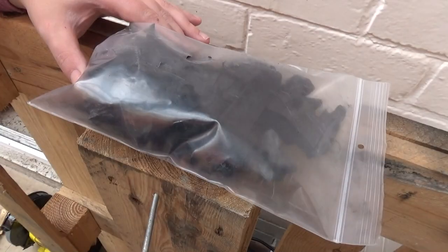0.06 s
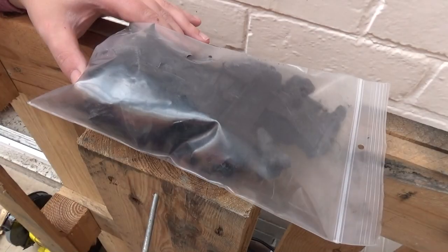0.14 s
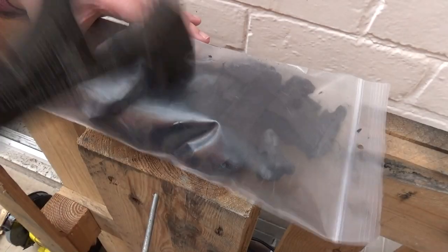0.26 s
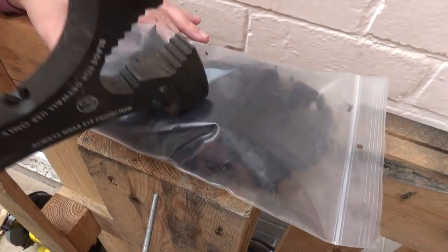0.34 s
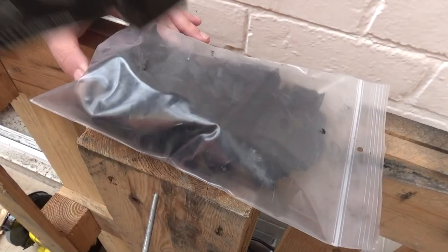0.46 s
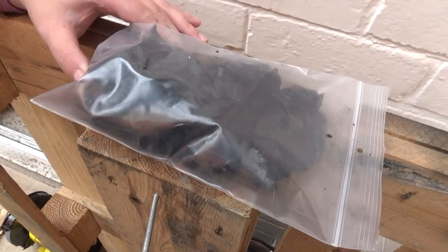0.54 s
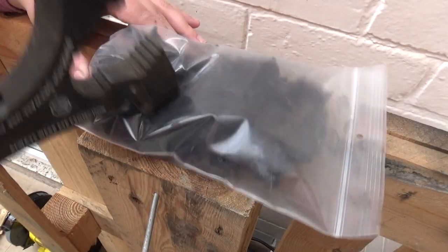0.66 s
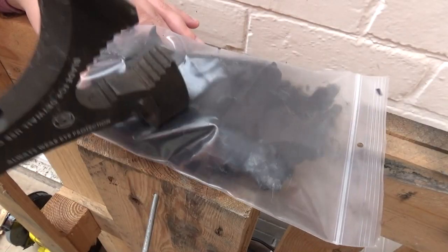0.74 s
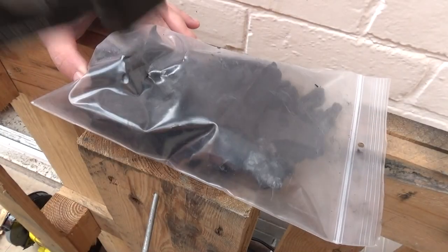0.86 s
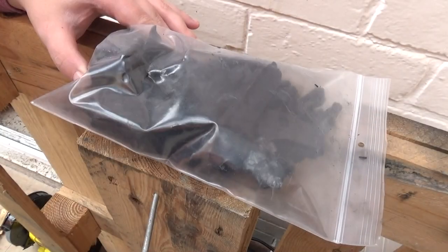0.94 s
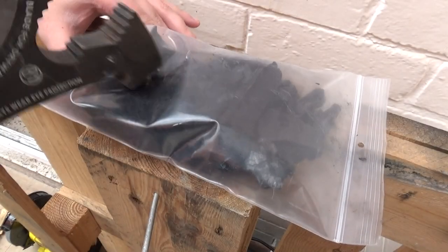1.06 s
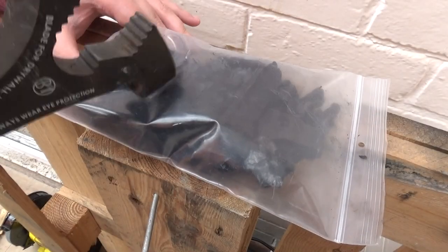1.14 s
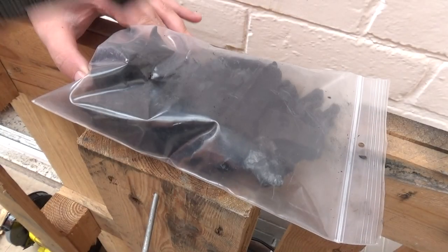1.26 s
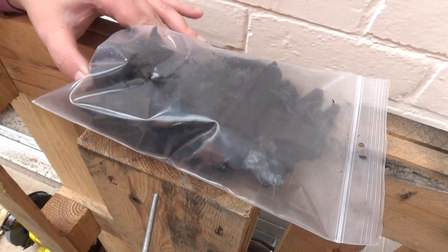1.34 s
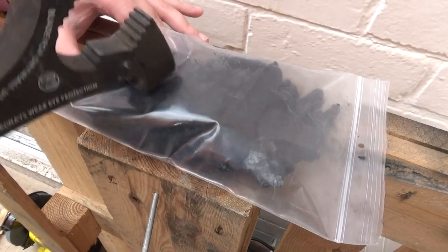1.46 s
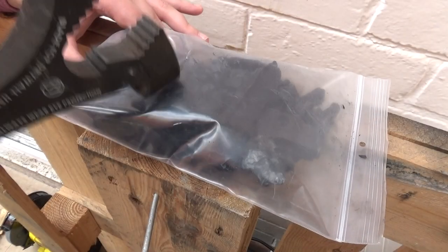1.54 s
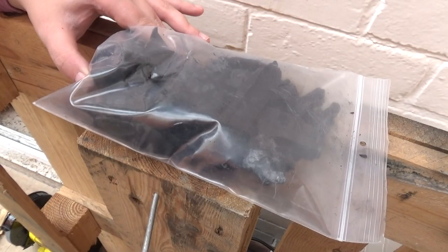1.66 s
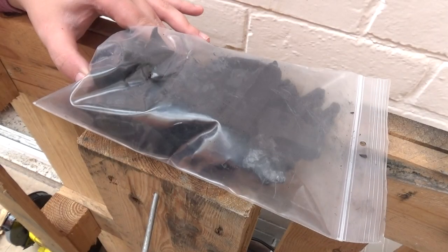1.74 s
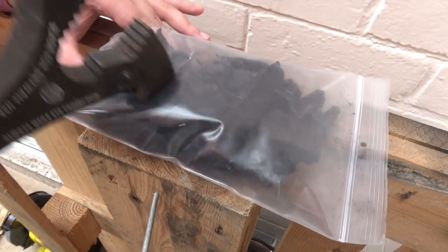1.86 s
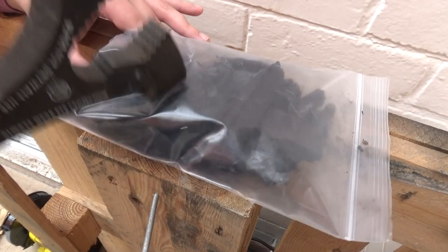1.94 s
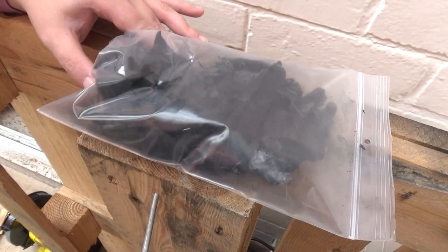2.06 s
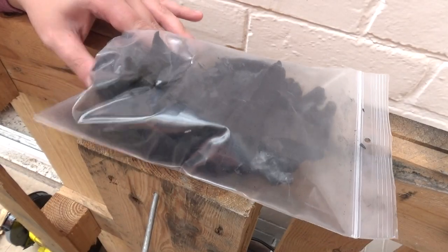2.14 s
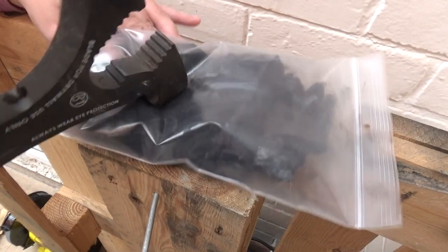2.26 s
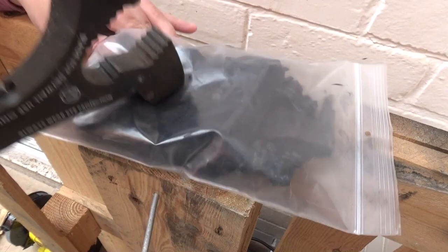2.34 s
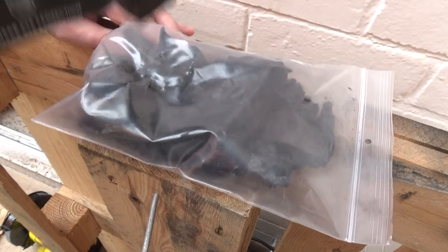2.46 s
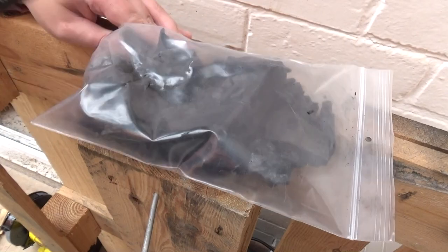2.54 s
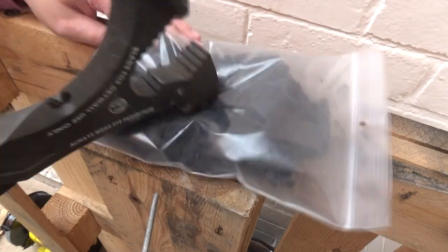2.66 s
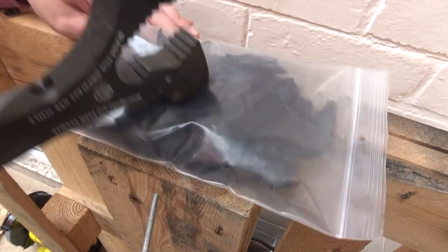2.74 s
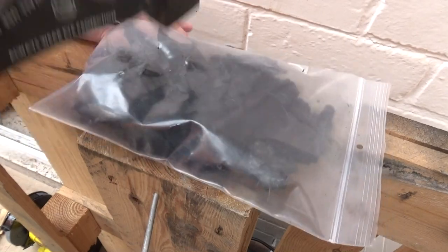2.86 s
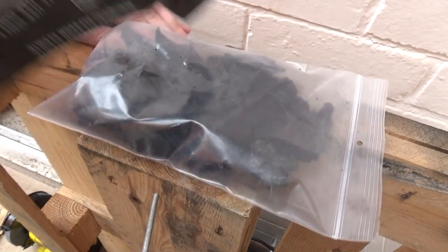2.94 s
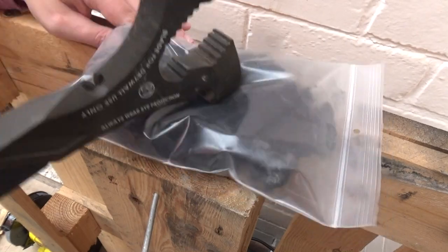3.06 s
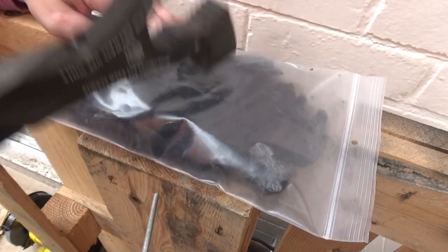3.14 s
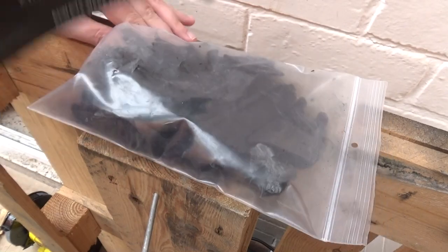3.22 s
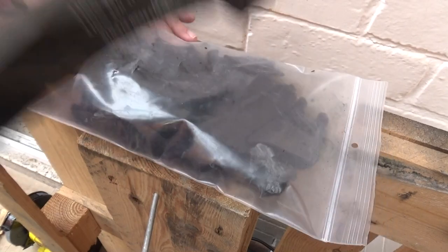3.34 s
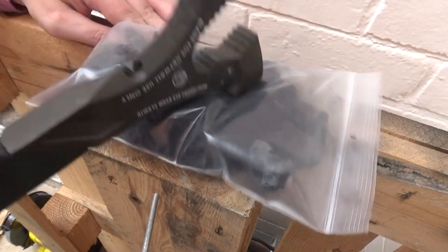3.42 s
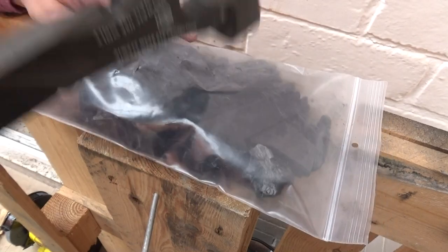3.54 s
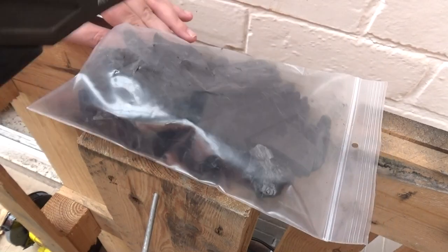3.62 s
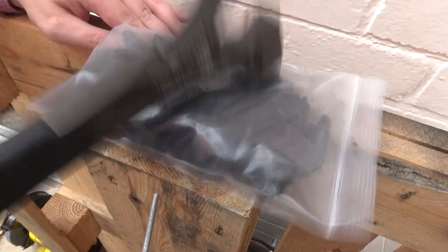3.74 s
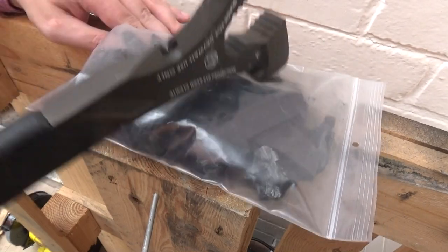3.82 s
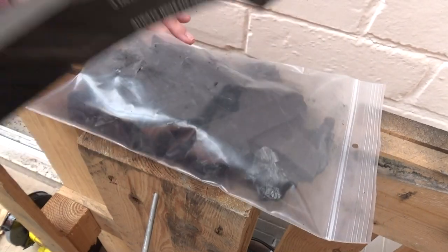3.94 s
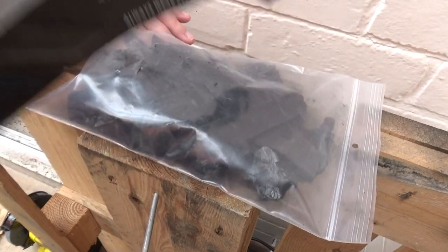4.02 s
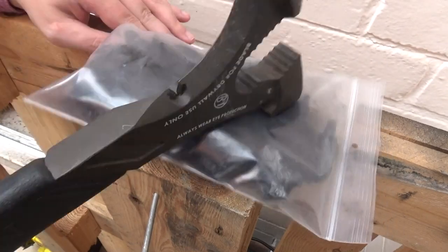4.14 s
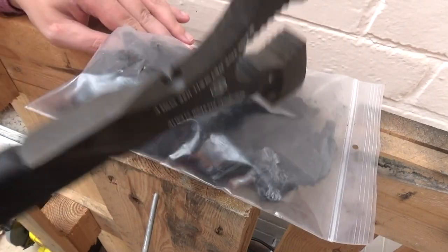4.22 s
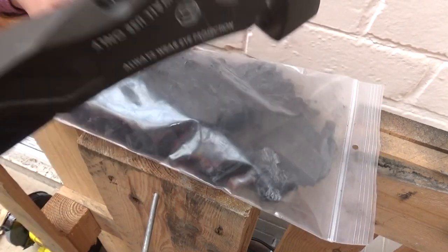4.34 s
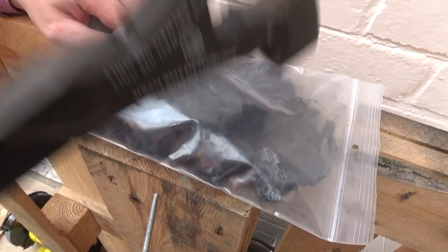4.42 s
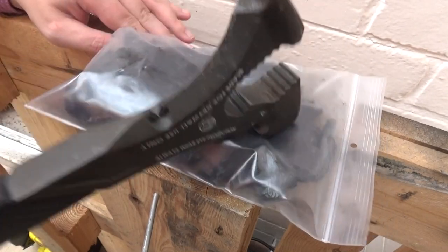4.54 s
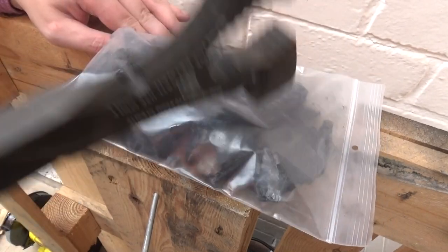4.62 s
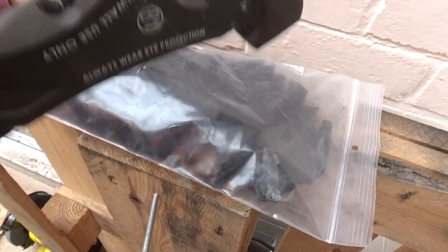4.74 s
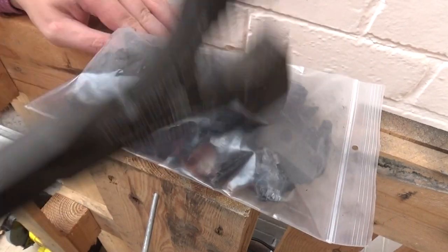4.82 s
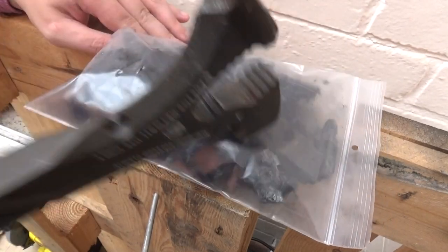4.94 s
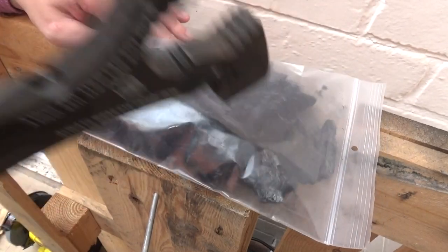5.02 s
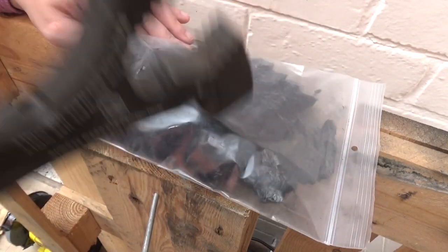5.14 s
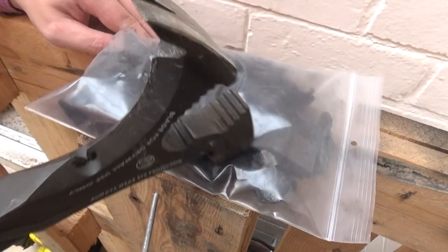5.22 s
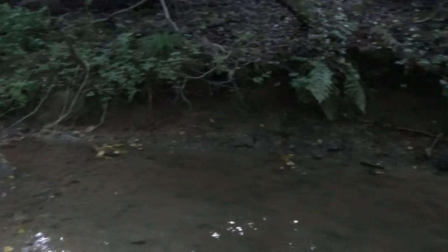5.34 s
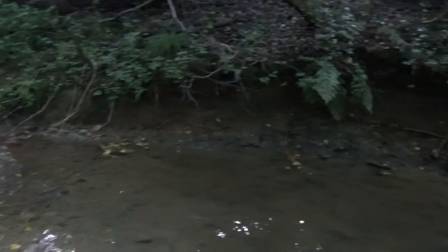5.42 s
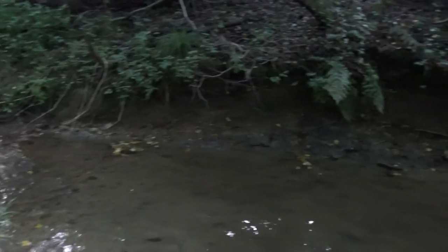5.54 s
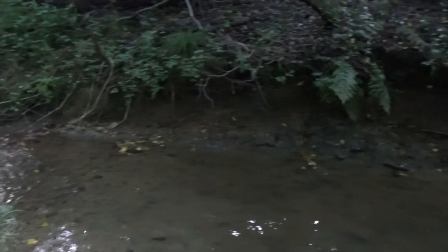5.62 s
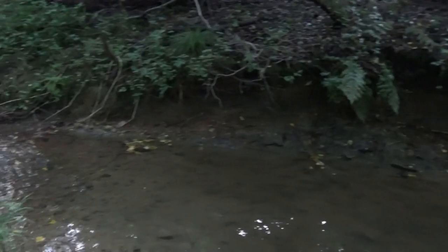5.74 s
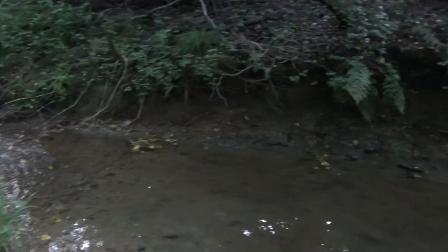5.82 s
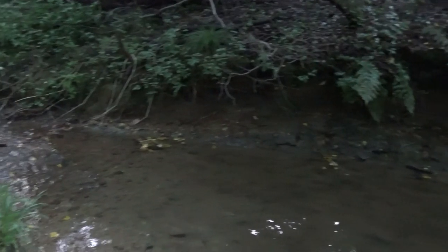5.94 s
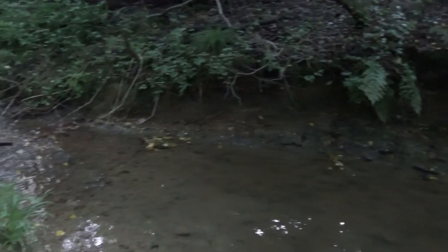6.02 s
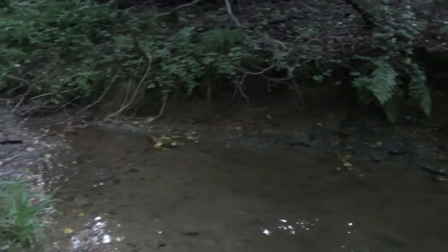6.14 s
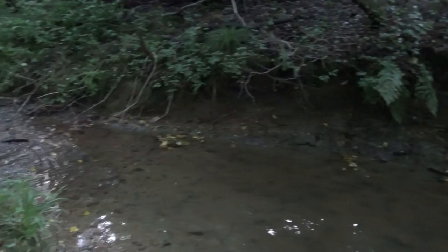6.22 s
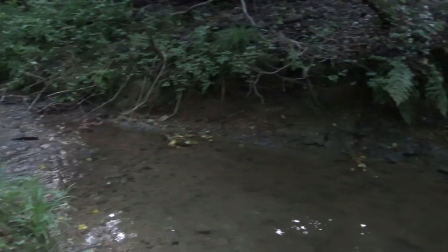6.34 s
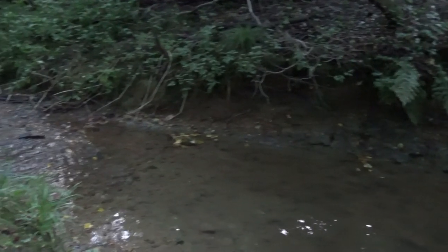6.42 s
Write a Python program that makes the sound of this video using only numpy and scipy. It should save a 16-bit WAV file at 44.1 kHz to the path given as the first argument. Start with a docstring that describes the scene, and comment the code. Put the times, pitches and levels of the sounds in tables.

```python
"""A hammer crushes charcoal in a plastic bag on a wooden bench, in a small brick workshop.
Each blow is a burst of fracture clicks, a knock and a ringing bench; a limiter ducks it,
so the room, an echo of banded noise, seems to swell behind it. Crumbs settle and the bag
crinkles between blows as resonated random clicks. Then the scene cuts to a woodland creek:
filtered noise as wash, narrow noise bands as gurgle and decaying ones as plopping drops."""
import sys
import numpy as np
from scipy import signal
from scipy.fft import rfft, irfft
from scipy.io import wavfile
from scipy.ndimage import uniform_filter1d

SR = 44100
rng = np.random.default_rng(int(sys.argv[2]) if len(sys.argv) > 2 else 0)


def unload_audio(sound):
    """Save the sound as a 16-bit wav file, at the path given as the first command line argument."""
    columns = np.transpose(np.atleast_2d(sound))
    # keep every value between -1 and 1, then stretch to whole-number steps
    steps = np.round(np.clip(columns, -1, 1) * 32767)
    wavfile.write(sys.argv[1], SR, steps.astype(np.int16))


N = 285765
# hammer blows: t/s, crush length/s, crush level/dB, knock level/dB, pitch factor, bench sway level/dB
HAMMER_BLOWS = [(-.016, .02, -0.5, -1.5, 1.17, -23.5), (0.38, 0.016, 4.5, 0, 1.25, -25),
                (0.759, 0.016, 0.5, -1, 1.05, -23.5), (1.161, 0.0065, 2.5, 3.5, 0.96, -19.5),
                (1.557, 0.008, -3.5, 3.5, 0.95, -18.5), (1.949, 0.0081, 0, 4, 1.14, -27),
                (2.35, .013, -4.5, -6, 1.82, -26.5), (2.757, .012, -6, -6.5, 1.02, -27),
                (3.119, 0.016, -7, -7.5, 0.92, -25), (3.501, 0.015, -5.5, -13, 0.68, -26.5),
                (3.859, 0.013, -7, -9.5, 1.63, -27), (4.224, 0.012, -7, -15, 1.35, -29),
                (4.586, 0.013, -8.5, -17, 1.35, -43), (4.954, 0.017, -10.5, -10.5, 1.34, -33),
                (5.298, 0.016, -12, -12, 0.66, -35)]
# fracturing charcoal, relative spectrum: f/Hz, density/(dB per Hz)
FRACTURE_SPECTRUM = [(30, -11), (80, -21.5), (200, -1), (450, -3.5), (900, 4), (1800, 1.5), (3000, -1),
                     (4800, -3), (6300, -6), (8000, -17), (11000, -19), (16000, -37)]
# knock of the bench top at pitch factor 1, relative spectrum: f/Hz, density/(dB per Hz)
KNOCK_SPECTRUM = [(40, -39.5), (120, -15.5), (200, -8), (450, 0.5), (750, -12.5), (1120, 6.5), (1650, -15),
                  (5000, -12), (16000, -76)]
# bench modes, before the spread from spot to spot: f/Hz, level/dB re knock, t60/s
BENCH_MODES = [(155.3, -20.5, 0.53), (181.9, -20, 0.38), (212.4, -30.5, 0.75), (246.3, -22.5, 0.49),
               (331.8, -11, 0.4), (436.7, -9.5, 0.21), (517.7, -8.5, 0.28), (564, -48, 0.94),
               (683, -10, 0.29), (755, -12, 0.31), (1010, -12.5, 0.19), (1156, -5, 0.11)]
# chips and creases of the bag, relative spectrum: f/Hz, density/(dB per Hz)
CRINKLE_SPECTRUM = [(60, -17), (300, 5), (900, 10.5), (2500, -3), (5700, 4.5), (8000, -15.5), (12000, -11),
                    (16000, -54)]
# handling of the bag, before RUSTLE_OFFSET_DB: t/s, level/dB
BAG_HANDLING = [(0.2, -43), (0.81, -41), (1.2, -44.5), (1.38, -55), (2.3, -41), (3.96, -54.5), (4.35, -76),
                (4.78, -55.5), (5.27, -60)]
# lumps shifting (low) and creases of the bag snapping (high): t/s, peak level/dB, centre f/Hz
SLIPS = [(0.131, -34, 1180), (.245, -17.5, 3500), (.316, -19, 1100), (0.458, -2, 2000), (0.554, -11, 1900),
         (0.565, -7.5, 1200), (0.604, -12.5, 1100), (.72, -23.5, 1343), (0.8045, -3, 4260),
         (.841, -2.5, 2280), (.952, -12, 1670), (.979, -11.5, 12000), (.997, -18, 1050),
         (1.12, -18.5, 1280), (1.753, -18.5, 1200), (2.133, -21, 1200), (2.26, -13.5, 2600),
         (2.262, -18, 450), (2.331, -16, 1500), (2.525, -16.5, 1310), (3.016, -24.5, 490),
         (3.233, -7, 2200), (3.795, -20, 1100), (4.35, -22, 4000), (4.456, -30, 3000), (4.484, -31, 800),
         (4.794, -20.5, 1900), (4.898, -28, 3500), (5.287, -21, 1100)]
# workshop echo: f/Hz, level/dB, t60/s
ROOM_ECHO = [(79.6, 0.5, 0.92), (198, -1.5, 0.5), (450, -3, 0.52), (694, 1, 0.26), (1100, -8, 0.34),
             (2000, -7.5, 0.34), (4630, -8, 0.32), (8000, -6.5, 0.26), (16000, -9, 0.26)]
# quiet air of the workshop, relative spectrum: f/Hz, density/(dB per Hz)
QUIET_SPECTRUM = [(20, -33), (45, -31), (70, -17), (200, -1.5), (500, -17), (2000, -10.5), (6000, -21),
                  (16000, -30)]
# steady wash of the creek, relative spectrum: f/Hz, density/(dB per Hz)
WASH_SPECTRUM = [(25, -5), (50, -2), (75, 7.5), (110, -2), (300, -2.5), (600, -6), (1000, -7.5),
                 (1500, -13), (2000, -16.5), (3500, -20.5), (5500, -20.5), (9000, -25), (16000, -26)]
# hollow gurgle, before the flow level: f/Hz, width/Hz, rms level/dB
GURGLE_BANDS = [(187.7, 23, -31), (257, 53, -28.5), (422, 25, -34), (473, 52, -32)]
# drops falling into the creek: t/s, level/dB, pitch factor
DROPS = [(5.411, -2, 1.41), (5.65, 0, 1), (6.0, -2, 1), (6.072, -6, 1.62)]
# ring of a drop at pitch factor 1: f/Hz, width/Hz, level/dB, decay time constant/s
DROP_BANDS = [(715, 140, -32, 0.088), (967, 85, -30, 0.12), (1370, 570, -36, 0.12),
              (2660, 400, -37.5, 0.035)]

GAP_START_S, GAP_END_S = 4.318, 4.343
CUT_S, CREEK_START_S = 5.36, 5.367
LEAD = 4410  # samples run before t = 0, trimmed at the end
EDGE_HZ = 15900
TIME_S = np.arange(-LEAD, N) / SR

# a soft knock means a cushion of crumbs, which the hammer touches before it bites
TOUCH_S, TOUCH_S_PER_DB, TOUCH_MAX_S = 0.002, -0.05, 0.0052
# the weaker the crush, the finer and brighter the pieces
TREBLE_DB, TREBLE_DB_PER_DB = -4, -0.5
# mode level and relative detuning change with the spot struck (standard deviations)
SPOT_SPREAD_DB, SPOT_DETUNE = 3.5, 0.0061
# long, hard crushes throw more crumbs; CRUMBS_DB holds for USUAL_CRUSH_S at 0 dB
CRUMBS_DB, USUAL_CRUSH_S, CRUMBS_DB_PER_S, CRUMBS_DB_PER_DB = -24, 0.011, 897, 1.13
# larger chips: mean delay, level over the crumbs, fade with lateness, range of pitch
CHIP_COUNT, CHIP_DELAY_S, CHIP_DB, CHIP_DB_PER_S = 7, 0.085, 19, -100
CHIP_LOW_HZ, CHIP_HIGH_HZ = 1200, 4500
# the drumming starts SINK_HZ higher and sinks as the hammer settles
SINK_HZ, SINK_S = 381.2, 0.036
RUSTLE_OFFSET_DB = -1.5
# a slip at SLIP_HZ dies with time constant SLIP_S; smaller, higher pieces stop sooner
SLIP_S, SLIP_HZ, SLIP_POWER = 0.0033, 1200, -0.34
# random faint slips: level over the rustle
STRAY_COUNT, STRAY_DB, STRAY_SPREAD_DB = 80, 16, 2.5
STRAY_LOW_HZ, STRAY_HIGH_HZ = 2000, 7500
# the gurgle eases off from its first level
FLOW_DB, EASE_DB_PER_S = 2, -3
PLOP_POWER = -5  # small, high drops die sooner: decay ~ pitch ** PLOP_POWER


def amp(db):
    """Decibels to gain."""
    return 10 ** (np.asarray(db) / 20)


def evened(x):
    """Scales to rms 1."""
    return x / np.sqrt(np.mean(x ** 2) + 1e-20)


def read(points, hz):
    """Interpolates a table along a log-frequency axis."""
    f_hz, value = np.transpose(points)
    return np.interp(np.log(hz + 1), np.log(f_hz + 1), value)


def add(mix, start_s, sound):
    """Mixes a sound in at start_s."""
    part = mix[max(round(start_s * SR) + LEAD, 0):][:len(sound)]
    part += sound[:len(part)]


def colour(x, points, tilt_db=0):
    """Minimum-phase filter of unit energy, tilted by tilt_db per octave above 500 Hz."""
    hz = abs(np.fft.fftfreq(2048, 1 / SR))
    octaves = np.log2(np.maximum(hz, 500))
    log_gain = np.log(amp(read(points, hz) + tilt_db * octaves))
    response = np.exp(np.conj(signal.hilbert(log_gain)))
    taps = np.fft.ifft(response).real[:len(hz) // 2]
    return signal.fftconvolve(x, taps / np.linalg.norm(taps))[:len(x)]


def clicks(size, per_s, spread_db):
    """Random clicks of uneven strength, rms 1."""
    strength = amp(spread_db * np.minimum(rng.exponential(1, size), 4))
    sign = rng.choice([-1, 1], size)
    return evened(strength * sign * (rng.random(size) < per_s / SR))


def burst(envelope, per_s, spread_db):
    """Uneven clicks under an envelope, carrying exactly its energy."""
    x = envelope * clicks(len(envelope), per_s, spread_db)
    return x * np.linalg.norm(envelope) / (np.linalg.norm(x) + 1e-12)


def band_noise(size, hz, width_hz):
    """Noise in one steep resonance, rms 1."""
    f_hz = np.fft.rfftfreq(size, 1 / SR)
    resonance = 1 / (1 + ((f_hz - hz) / (0.78 * width_hz)) ** 2)
    return evened(irfft(rfft(rng.standard_normal(size)) * resonance, size))


def fractures(t_s, length_s, crush_db):
    """Coarse cracks come first, finer and brighter ones as the lumps give way."""
    first_touch = amp(-12.0) * np.exp(np.minimum(t_s, 0) / 0.012)
    biting = np.exp(-np.maximum(t_s - length_s, 0) / 0.0009)
    pressure = np.where(t_s >= 0, biting, first_touch)
    fine_share = np.clip(0.2 + 0.68 * t_s / length_s, 0.01, 1)
    coarse = colour(burst(pressure * np.sqrt(1 - fine_share), 9000, 1.85), FRACTURE_SPECTRUM, -1.45)
    fine = colour(burst(pressure * np.sqrt(fine_share), 7000, 9.8), FRACTURE_SPECTRUM, 1.0)
    return coarse + amp(TREBLE_DB + TREBLE_DB_PER_DB * crush_db) * fine


def bench_knock(t_s, pitch):
    """The bench top answers the landing with a short, dense burst of clicks."""
    envelope = (t_s >= 0) * np.exp(-np.maximum(t_s, 0) / 0.0066)
    return colour(burst(envelope, 12000, 0.15), np.array(KNOCK_SPECTRUM) * [pitch, 1])


def bench_ring(after_s):
    """Decaying modes; every blow lands on another spot, so they share it differently."""
    ring = np.zeros(len(after_s))
    for hz, db, t60_s in BENCH_MODES:
        share, shift = rng.standard_normal(2)
        level_db = db + SPOT_SPREAD_DB * share - 60 * after_s / t60_s
        cycles = hz * (1 + SPOT_DETUNE * shift) * after_s + rng.random()
        ring += amp(level_db) * np.sin(2 * np.pi * cycles)
    return ring * (1 - np.exp(-after_s / 0.022))


def drumming(after_s, pitch, knock_db):
    """A blow that reaches the wood sets the whole top drumming, low and hollow."""
    envelope = (after_s / 0.047) ** 2 * np.exp(2 * (1 - after_s / 0.044))
    sink_cycles = np.cumsum(SINK_HZ * np.exp(-after_s / SINK_S)) / SR
    tone = signal.hilbert(band_noise(len(after_s), 450 * pitch, 230))
    sunk = (tone * np.exp(2j * np.pi * sink_cycles)).real
    # the caller applies knock_db once more
    return amp(-17 + 0.49 * knock_db) * envelope * sunk


def bench_sway(after_s):
    """The heavy frame takes a few cycles to swing up: a low tone plus narrow noise."""
    swing = (after_s / 0.052) ** 3 * np.exp(3 * (1 - after_s / 0.052))
    tone = np.sin(2 * np.pi * (84 * after_s + rng.random()))
    return swing * (tone + amp(-5.5) * band_noise(len(after_s), 96, 33))


def chip(x, hz):
    """A chip or crease answers a click with about one cycle at its own pitch; unit energy."""
    b, a = signal.iirpeak(min(hz, 0.4 * SR), 1.1, fs=SR)
    impulse = (np.arange(2048) == 0) * 1.0
    return signal.lfilter(b, a, x) / np.linalg.norm(signal.lfilter(b, a, impulse))


def grit(size, per_s, spread_db):
    """Chips and creases of seven sizes, each ticking at its own random moments."""
    ticking = np.zeros(size)
    for hz in np.geomspace(500, 10000, 7):
        ticking += chip(clicks(size, per_s / 7, spread_db), hz) * np.sqrt(hz)
    return evened(colour(ticking, CRINKLE_SPECTRUM))


def slip(peak_db, hz):
    """A snap and a short scrape at the pitch of the piece that moves."""
    t_s = np.arange(SR // 20) / SR
    decay_s = SLIP_S * (hz / SLIP_HZ) ** SLIP_POWER
    scrape = np.exp(-t_s / decay_s) * clicks(len(t_s), 4000, 3.6)
    scrape[0] += 4  # the snap
    lowpass = signal.butter(1, min(2 * hz, 0.45 * SR), fs=SR, output="sos")
    sound = signal.sosfilt(lowpass, chip(scrape, hz))
    return amp(peak_db) * sound / abs(sound).max()


def chips(size):
    """Larger pieces thrown by a blow snap against the bag one by one; late ones are fainter."""
    out = np.zeros(size)
    for when, pitch in rng.random((CHIP_COUNT, 2)):
        delay_s = 2 * CHIP_DELAY_S * when
        hz = CHIP_LOW_HZ * (CHIP_HIGH_HZ / CHIP_LOW_HZ) ** pitch
        snap = slip(CHIP_DB + CHIP_DB_PER_S * delay_s, hz)
        out += np.pad(snap, (round(delay_s * SR), size))[:size]
    return out


def thrown_crumbs(after_s, length_s, crush_db):
    """Thrown crumbs fall back against the bag in clumps, with a few larger chips."""
    size = len(after_s)
    falling = after_s / 0.072 * np.exp(1 - after_s / 0.04)
    slow_noise = evened(uniform_filter1d(rng.standard_normal(size), size=260))
    clumps = evened(amp(0.5 * slow_noise))
    level_db = CRUMBS_DB + CRUMBS_DB_PER_S * (length_s - USUAL_CRUSH_S) + CRUMBS_DB_PER_DB * crush_db
    return amp(level_db) * (falling * clumps * grit(size, 440, 0.89) + chips(size))


def blow(touch_s, length_s, crush_db, knock_db, pitch, sway_db):
    """The hammer breaks through the lumps and lands on the bench: returns hit and bench."""
    t_s = np.arange(SR * 3 // 4) / SR - touch_s
    after_s = np.maximum(t_s, 0)
    hit = amp(crush_db) * fractures(t_s, length_s, crush_db)
    hit += amp(knock_db) * bench_knock(t_s, pitch)
    hit += thrown_crumbs(after_s, length_s, crush_db)
    bench = amp(knock_db) * (bench_ring(after_s) + drumming(after_s, pitch, knock_db))
    bench += amp(sway_db) * bench_sway(after_s)
    return hit, bench


def rustle_gain(t_s):
    """How strongly the bag is handled at t_s."""
    return amp(np.interp(t_s, *np.transpose(BAG_HANDLING)) + RUSTLE_OFFSET_DB)


def bag_rustle():
    """Handling makes the bag and its crumbs crinkle: grit under the handling gain."""
    return rustle_gain(TIME_S) * grit(len(TIME_S), 1100, 1.3)


def slips():
    """Clear slips of lumps and creases, and random faint ones that follow the handling."""
    out = np.zeros(len(TIME_S))
    for when, strength, pitch in rng.random((STRAY_COUNT, 3)):
        start_s = when * CUT_S
        hz = STRAY_LOW_HZ * (STRAY_HIGH_HZ / STRAY_LOW_HZ) ** pitch
        level_db = STRAY_DB + STRAY_SPREAD_DB * (2 * strength - 1)
        add(out, start_s, rustle_gain(start_s) * slip(level_db, hz))
    for start_s, peak_db, hz in SLIPS:
        add(out, start_s, slip(peak_db, hz))
    return out


def workshop_echo(x):
    """Diffuse echo: in each band the room stores the power it is fed, builds up, leaks away."""
    edges_hz = np.geomspace(50 + 500, 17000 + 500, num=25) - 500
    f_hz, level_db, t60_s = np.transpose(ROOM_ECHO)
    build_up = np.exp(-1 / (0.0077 * SR))
    out = np.zeros(len(x))
    noise = rng.standard_normal((2, len(x)))  # neighbouring bands use different noise
    for k, (low_hz, high_hz) in enumerate(zip(edges_hz, edges_hz[1:])):
        band = signal.butter(3, [low_hz, high_hz], "bandpass", fs=SR, output="sos")
        hz = np.sqrt(low_hz * high_hz)
        keep = np.exp(-np.log(1e6) / (read(np.c_[f_hz, t60_s], hz) * SR))
        fed = signal.sosfilt(band, x) ** 2
        stored = signal.lfilter([1 - keep], [1, -keep], fed)
        power = signal.lfilter([1 - build_up], [1, -build_up], stored)
        carrier = evened(signal.sosfilt(band, noise[k % 2]))
        out += amp(read(np.c_[f_hz, level_db], hz)) * np.sqrt(power) * carrier
    return out


def workshop_quiet():
    """Faint steady noise of the room."""
    return amp(-55.5) * colour(rng.standard_normal(len(TIME_S)), QUIET_SPECTRUM)


def water_flow():
    """Water gurgles in a hollow, as narrow noise bands, over a thin wash."""
    size = len(TIME_S)
    wash = amp(-33.5) * colour(rng.standard_normal(size), WASH_SPECTRUM)
    flow_db = FLOW_DB + EASE_DB_PER_S * np.maximum(TIME_S - CREEK_START_S, 0)
    gurgle = sum(amp(db) * band_noise(size, hz, width_hz) for hz, width_hz, db in GURGLE_BANDS)
    return wash + amp(flow_db) * gurgle


def drop_plop(pitch):
    """A drop rings in several noisy resonances; a higher one is narrower and shorter."""
    t_s = np.arange(SR // 2) / SR
    ring = np.zeros(len(t_s))
    for hz, width_hz, db, decay_s in DROP_BANDS:
        decay = np.exp(-t_s / (decay_s * pitch ** PLOP_POWER))
        ring += amp(db) * band_noise(len(t_s), hz * pitch, width_hz / pitch) * decay
    return ring * (1 - np.exp(-t_s / 0.0017))


def creek():
    """Flowing water, with drops plopping into the pool."""
    water = water_flow()
    for start_s, db, pitch in DROPS:
        add(water, start_s, amp(db) * drop_plop(pitch))
    return water


def scene():
    """Blows and bag in the workshop, then the cut to the creek."""
    near = bag_rustle()
    bench = np.zeros(len(TIME_S))
    for strike_s, length_s, crush_db, knock_db, pitch, sway_db in HAMMER_BLOWS:
        touch_s = np.clip(TOUCH_S + TOUCH_S_PER_DB * knock_db, 0, TOUCH_MAX_S)
        hit, ring = blow(touch_s, length_s, crush_db, knock_db, pitch, sway_db)
        add(near, strike_s - touch_s, hit)
        add(bench, strike_s - touch_s, ring)
    near += slips()
    indoors = near + bench + workshop_echo(near) + workshop_quiet()
    indoors_gate = uniform_filter1d((TIME_S < CUT_S) * 1.0, size=40)
    return (indoors * indoors_gate + creek() * (TIME_S > CREEK_START_S))[None]


def limiter(x):
    """Fast limiter: full reduction above threshold, level hold falling at a steady rate."""
    sense, attack = np.exp(-1 / (0.008 * SR)), np.exp(-1 / (0.00029 * SR))
    threshold_db, release_db_per_s = -9, 115
    power = signal.lfilter([1 - sense], [1, -sense], x[0] ** 2)
    power_db = 10 * np.log10(power + 1e-12)
    fall_db = TIME_S * release_db_per_s
    held_db = np.maximum.accumulate(power_db + fall_db) - fall_db
    over_db = np.maximum(held_db - threshold_db, 0)
    return x / amp(signal.lfilter([1 - attack], [1, -attack], over_db))


def record(dry):
    """Bass roll-off, limiter, clipping of what slips past, a brief silence, band limit."""
    highpass = signal.butter(3, 45, "highpass", fs=SR, output="sos")
    ducked = limiter(signal.sosfilt(highpass, dry))
    in_gap = (TIME_S > GAP_START_S) & (TIME_S < GAP_END_S)
    running = uniform_filter1d(1.0 - in_gap, size=40)
    clipped = running * np.clip(ducked, -0.97, 0.97)
    lowpass = signal.firwin(511, EDGE_HZ, window=("kaiser", 10), fs=SR)
    return signal.oaconvolve(clipped, lowpass[None], "same")[:, LEAD:]


dry = scene()
out = record(dry)
unload_audio(out)
```